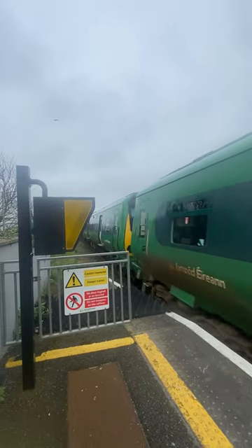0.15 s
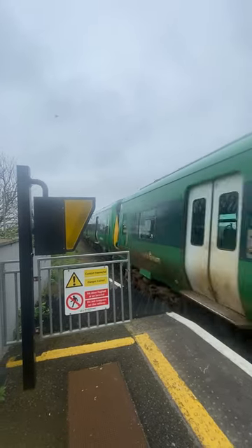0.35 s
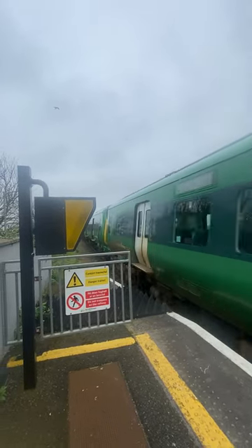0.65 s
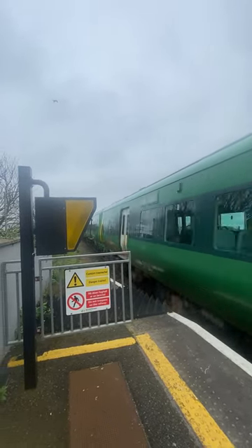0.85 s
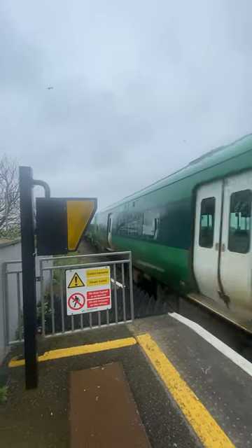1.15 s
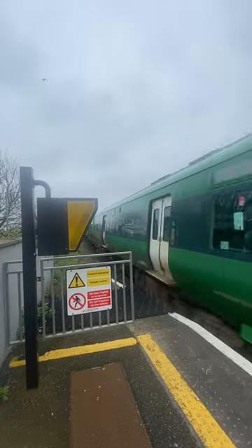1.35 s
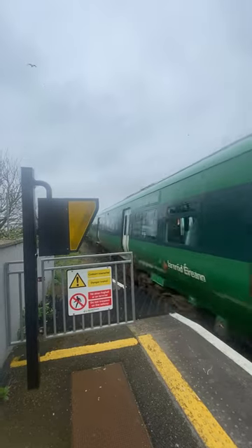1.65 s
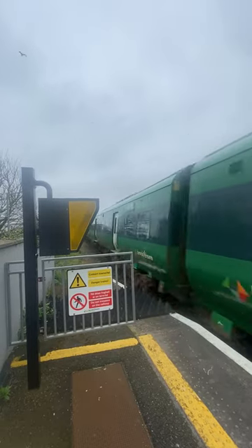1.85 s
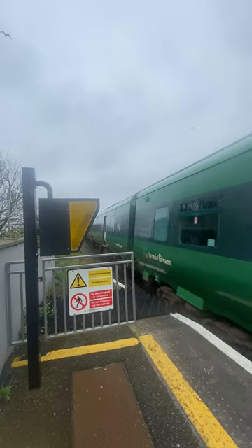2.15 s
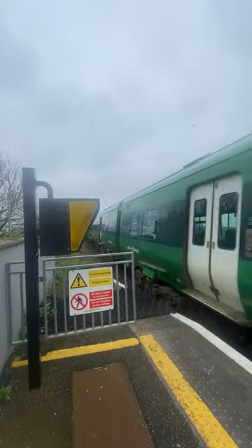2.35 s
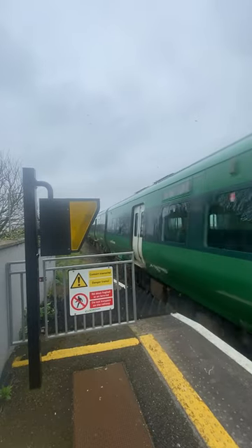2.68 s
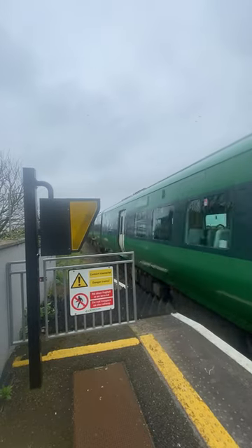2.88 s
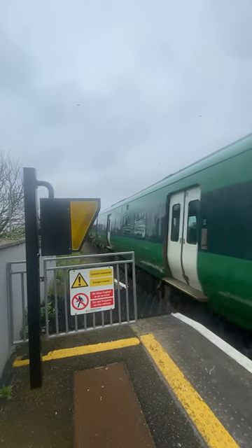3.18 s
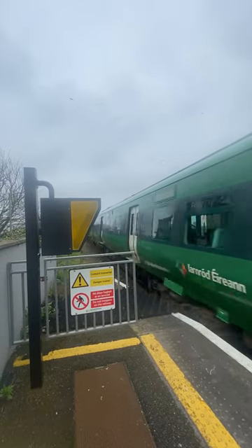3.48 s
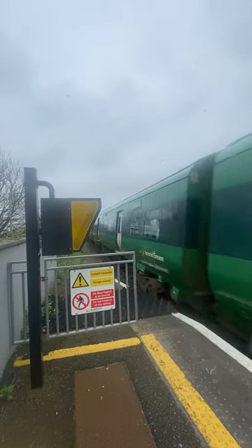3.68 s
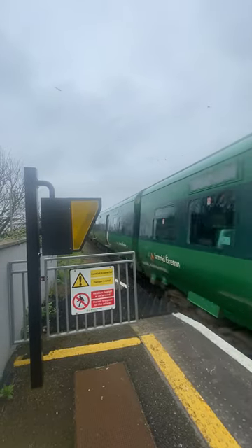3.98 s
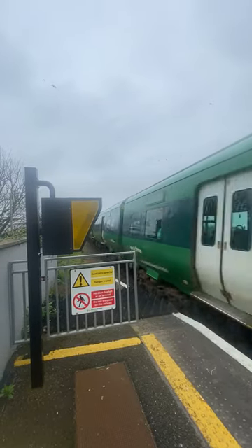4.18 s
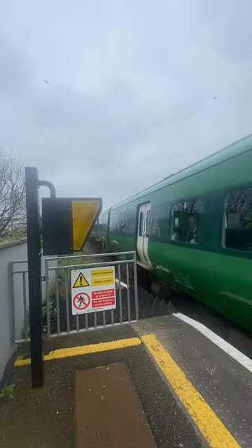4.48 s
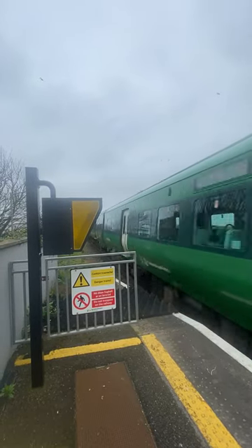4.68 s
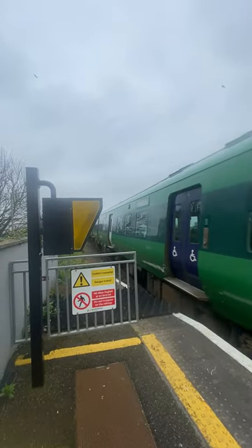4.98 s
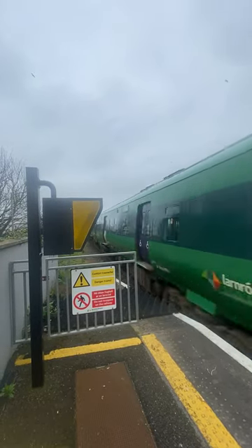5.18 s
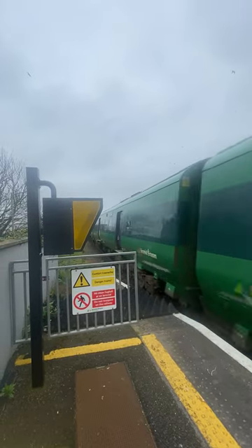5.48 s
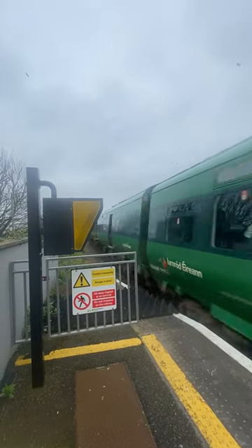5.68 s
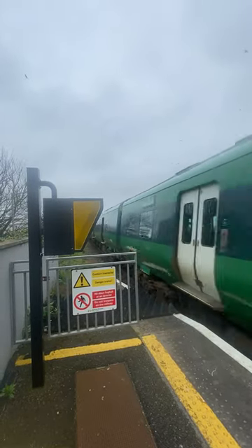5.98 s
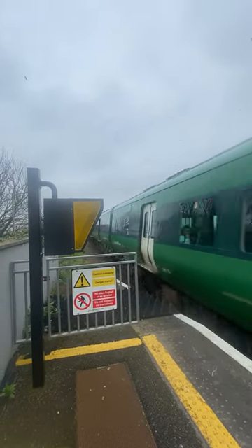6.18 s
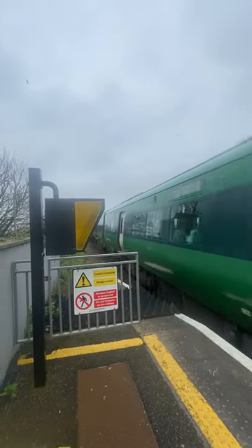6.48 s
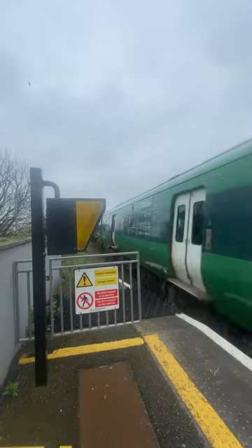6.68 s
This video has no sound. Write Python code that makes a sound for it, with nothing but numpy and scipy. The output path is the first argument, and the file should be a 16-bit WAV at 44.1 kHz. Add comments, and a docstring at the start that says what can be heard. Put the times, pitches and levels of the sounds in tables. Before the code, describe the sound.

A long diesel railcar train passes a few metres from a stereo microphone on an open platform. Engines drone low and beat together, swelling at the start, near the middle and near the end. Wheel roar and bright rush are strongest in the first second, then high squeals waver, air puffs quickly around four seconds, and hiss and thin squealing continue to the end.

```python
"""A station platform: a diesel railcar train runs past, four metres from a two-port microphone.
Exhausts pass in pairs, summed sines that beat as their pitch drops; a throb, generators and whines join.
Wheels and rails roar as coloured noise; narrow tones, rasps, air bursts and squeals are narrow noises.
Air hisses as high noise; a compressor chuffs in noise puffs; soft thuds ring as brief decaying tones."""
import sys
import numpy as np
from scipy import signal
from scipy.fft import rfft, irfft, next_fast_len
from scipy.io import wavfile
from scipy.ndimage import uniform_filter1d, map_coordinates

SR = 44100
rng = np.random.default_rng(int(sys.argv[2]) if len(sys.argv) > 2 else 0)


def dump(signal):
    """Clip the signal to [-1, 1] and save it as 16-bit WAV at the path in sys.argv[1]."""
    limited = np.clip(np.atleast_2d(signal).T, -1, 1)
    pcm = np.round(limited * 32767).astype(np.int16)
    wavfile.write(sys.argv[1], SR, pcm)


N = 301658
T = np.arange(N) / SR


def amp(db):
    """Amplitude ratio of a level in dB."""
    return 10 ** (np.asarray(db) / 20)


def unit(x):
    """x scaled to rms 1."""
    return x / np.sqrt(np.mean(x ** 2) + 1e-20)


def along(points, hz):
    """(hz, value) points interpolated on a log axis."""
    f, v = np.transpose(points)
    return np.interp(np.log(hz + 1), np.log(f + 1), v)


def curves(rows):
    """One value per sample for each column after the time."""
    s, *cols = np.transpose(rows)
    return [np.interp(T, s, c) for c in cols]


def wobble(rate_hz):
    """A smooth random curve, rate_hz knots a second."""
    coarse_s = T[::32]
    knots = rng.standard_normal(int(N * rate_hz / SR) + 4)
    return np.interp(T, coarse_s, map_coordinates(knots, [coarse_s * rate_hz]))


def filtered(x, response):
    """x times a complex response of frequency."""
    m = next_fast_len(N + 8192)
    return irfft(rfft(x, m) * response(np.fft.rfftfreq(m, 1 / SR)), m)[..., :N]


def noise(gain, patchy_db):
    """Two unrelated noises of rms 1, coloured alike, with shared patches of random gain."""
    z = signal.stft(rng.standard_normal((2, N)), nperseg=512)[2]
    field = rng.standard_normal(z.shape[1:])
    field = uniform_filter1d(field, size=5, axis=0)  # over frequency
    field = uniform_filter1d(field, size=10, axis=1)  # over time
    pair = signal.istft(z * amp(patchy_db * unit(field)), nperseg=512)[1][:, :N]
    return unit(filtered(pair, gain))


SPEED_M_S, TRACK_M, SOUND_M_S = 11.4164, 3.9652, 343


def passing(at_s):
    """Clock of a source abreast at at_s, delayed by its sound path (Doppler), and its nearness 0-1."""
    distance_m = np.hypot(TRACK_M, SPEED_M_S * (T - at_s))
    return T - at_s - distance_m / SOUND_M_S, TRACK_M / distance_m


# wheels over an uneven spot: start_s, pitch_hz, peak_db
THUDS = [(4.361, 183, -21), (5.55, 170, -23), (6.1, 172.5, -29)]


def thuds():
    """A soft blow rings the track bed for a few cycles."""
    rise_s = 0.018
    out = np.zeros(N)
    for start_s, hz, peak_db in THUDS:
        since_s = np.maximum(T - start_s, 0)
        swell = since_s / rise_s * np.exp(1 - since_s / rise_s)
        out += amp(peak_db) * swell * np.sin(2 * np.pi * hz * since_s)
    return out


# compressor: abreast_s, strokes_hz, abreast_db
COMPRESSOR = (4.408, 15.6, -26.5)
PUFF_RISE_S = 0.0076


def compressor():
    """One short puff of air a stroke, loudest around abreast."""
    at_s, strokes_hz, db = COMPRESSOR
    clock, near = passing(at_s)
    since_s = (strokes_hz * clock + 0.14) % 1 / strokes_hz
    puff = since_s / PUFF_RISE_S * np.exp(1 - since_s / PUFF_RISE_S)
    # hz, relative_db
    spectrum = [(1500, 4), (3500, -1.5), (5500, 5.0), (7000, -2.5), (9000, 0), (14000, -19)]
    air = noise(lambda hz: amp(along(spectrum, hz)), patchy_db=5.0)
    uneven = amp(1.3 * wobble(14))
    return amp(db) * uneven * near ** 1.02 * puff * air


# underfloor tones: abreast_s, pitch_hz, abreast_db (before wobble)
WHINES = [(-0.32, 221, -25.5), (0.9, 281, -38), (4, 222, -34), (4, 186, -38), (4.5, 220, -49),
          (5, 275, -38.5), (1.5, 300, -41.5), (1.5, 226, -37)]


def whines():
    """Single underfloor tones that slide down as they pass."""
    out = np.zeros(N)
    for at_s, hz, db in WHINES:
        clock, near = passing(at_s)
        level = amp(db + 2.0 * wobble(9.8)) * near ** 1.24
        cycles = hz * clock + 0.08 * wobble(12) + rng.random()
        out += level * np.sin(2 * np.pi * cycles)
    return out


# underfloor generator sets: abreast_s, pitch_hz, abreast_db, overtone_db (2nd harmonic, abreast)
GENERATORS = [(1.3, 75.45, -29, -30), (2.9, 84.5, -53, -63), (5.15, 75.96, -27.5, -31.5),
              (6.301, 80, -34, -61)]


def generators():
    """Underfloor sets hum below the exhaust pitch; their two overtones carry less far."""
    out = np.zeros(N)
    for at_s, hz, db, over_db in GENERATORS:
        clock, near = passing(at_s)
        turn = 2 * np.pi * (hz * clock + rng.random())
        overtones = np.sin(2 * turn) + amp(-7.0) * np.sin(3 * turn)
        out += amp(db) * near ** 0.5 * np.sin(turn)
        out += amp(over_db) * near ** 4.4 * overtones
    return out


# noisy parts of the underframe: abreast_s, rumble_db, roar_db, rush_db, hiss_db (each abreast)
RUNNING_GEAR = [(0.05, -31.5, -25.5, -20, -27.5), (0.45, -40, -28, -21.5, -25.5),
                (0.95, -44, -40, -32, -38), (1.45, -31.5, -42, -30, -35.5), (2.4, -35.5, -36, -37, -43),
                (2.9, -36, -32.5, -34, -54), (3.45, -36.5, -50, -40, -40.5), (3.95, -35, -35, -37, -42),
                (4.3, -38, -31, -30, -34.5), (5.25, -32.5, -38.5, -34, -36), (5.65, -31.5, -38.5, -59, -50),
                (6.1, -38, -32.5, -56, -55), (6.55, -32.5, -29.5, -33, -44)]
# steady level of the rest of the train: one level_db each for rumble, roar, rush, hiss
REST_DB = [-35, -36.5, -43, -46.5]
# fading with distance: one exponent of nearness each for rumble, roar, rush, hiss
FADES = [1.62, 1.74, 1.86, 2.4]
# low rumble spectrum: hz, relative_db (per Hz)
RUMBLE = [(31, -45), (42, -14), (63, -4.5), (105, 0), (220, -1.5), (350, -7.5), (600, -11.5), (1000, -68)]
# wheel roar spectrum: hz, relative_db (per Hz)
ROAR = [(200, -6), (420, -3.5), (800, 2), (1300, -0.5), (1800, -5.5), (2300, -5), (3000, -9), (4500, -19)]
# upper rush spectrum: hz, relative_db (per Hz)
RUSH = [(1500, -11), (2700, -3.5), (4000, -11), (5200, -4), (6300, -6), (7500, -9.5), (9000, -33)]
# high air hiss spectrum: hz, relative_db (per Hz)
HISS = [(6000, -61), (8000, 7.5), (9000, 4.5), (11000, 2), (13000, 1.5), (15000, -1), (16000, -23)]


def rolling():
    """Wheel and rail noise in four layers; each swells as a noisy part of the underframe passes."""
    at_s, *levels_db = np.transpose(RUNNING_GEAR)
    near = np.array([passing(s)[1] for s in at_s])
    spectra, patches_db = (RUMBLE, ROAR, RUSH, HISS), (1.03, 1.25, 1.5, 2.0)
    out = 0
    for db, rest_db, fade, spectrum, patchy_db in zip(levels_db, REST_DB, FADES, spectra, patches_db):
        power = amp(rest_db) ** 2 + amp(db) ** 2 @ near ** (2 * fade)
        flutter = amp(0.6 * wobble(20))
        layer = noise(lambda hz: amp(along(spectrum, hz)), patchy_db)
        out = out + np.sqrt(power) * flutter * layer
    return out


ATTACK_S, RELEASE_S = 0.054, 0.084


def spell(start_s, end_s, first_db, last_db):
    """Soft rise before start_s, steady drift in level, soft fall after end_s."""
    rise = 1 + (T - start_s) / ATTACK_S
    fall = 1 + (end_s - T) / RELEASE_S
    edges = np.clip(np.minimum(rise, fall), 0, 1)
    return np.sin(np.pi / 2 * edges) ** 2 * amp(np.interp(T, [start_s, end_s], [first_db, last_db]))


def narrow_sound(hz, width_hz):
    """Narrow noise, swelling unevenly; the narrower it is, the more of a wavering tone it holds."""
    off_hz = np.fft.fftfreq(next_fast_len(N), 1 / SR)  # from the centre
    turn = 2 * np.pi * np.cumsum(hz + 0.07 * width_hz * wobble(5)) / SR
    phases = np.exp(2j * np.pi * rng.random((2, len(off_hz))))
    grains = phases / np.abs(1 + 2j * off_hz / width_hz) ** 1.49
    pair = unit((np.fft.ifft(grains)[:, :N] * np.exp(1j * turn)).real)
    waver = 2 * np.pi * np.cumsum(0.22 * width_hz * wobble(14)) / SR
    clear = np.exp(-(width_hz / 500) ** 2)  # broad sounds hold almost no tone
    pair[0] += 0.44 * clear * amp(2.5 * wobble(9.1)) * np.sin(turn + waver)
    swell_db = 0.85 * wobble(45) + 0.8 * wobble(22) + 0.74 * wobble(8.5)
    return amp(swell_db) * pair


# narrow tones, rasps and air bursts of the passing train: pitch_hz, width_hz,
# spells [start_s, end_s, first_db, last_db, pitch_drop_hz]
NARROW_SOUNDS = [ (742, 24, [(0.1, 0.62, -37, -38, 13)]), (769, 28.8, [(4.1, 4.5, -40, -46, 10)]),
                 (852, 41.5, [(2.62, 3.3, -38, -40.5, 38), (5.8, 6.2, -41.5, -39, 0.48),
                 (6.35, 6.64, -30.5, -36, 11.8)]), (3890, 1000, [(0.0044, 1.04, -27, -39, 0.0045)]),
                 (5040, 240, [(5.1, 5.4, -41, -45, -0.5), (6.1, 6.4, -39, -45, 0.5),
                 (6.53, 6.84, -36.5, -38, 57)]), (5250, 920, [(4.13, 4.26, -32, -42, 0),
                 (6.42, 6.84, -35.5, -44, 0.0025)]), (5660, 160, [(1.3, 1.39, -42, -38, 0),
                 (1.62, 1.68, -40, -35, 0)]), (5870, 120, [(1.44, 1.5, -46, -41, 0),
                 (1.56, 1.6, -31, -32, 31), (1.78, 1.84, -37, -43, 0)]),
                 (6700, 200, [(6.02, 6.38, -46, -41, -7.5)]), (7050, 37.2, [(2.27, 2.76, -38, -32, 19.5),
                 (3.12, 3.2, -29, -38, -2)]), (7040, 470, [(4.17, 4.56, -36, -34, 101)]),
                 (8600, 80, [(5.5, 5.95, -40, -38, 30.1), (6.08, 6.33, -40, -39, 30.04),
                 (6.45, 6.84, -39, -39, 30)]), (11200, 54, [(5.4, 5.62, -48, -46, 20),
                 (6.0, 6.26, -43, -51, 20)]), (8850, 290, [(2.4, 3.1, -47, -43, -0.5),
                 (3.34, 3.7, -39, -52, 2), (3.86, 4.09, -42, -36, -200)]),
                 (9045, 34.6, [(4.72, 5, -36, -38.5, 21), (6.05, 6.45, -50, -35, -30.5)]),
                 (10910, 510, [(3.33, 5.1, -50.5, -41.5, 0.5), (5.26, 5.9, -37.5, -42, 148.5),
                 (5.98, 6.27, -37, -41, -6)]), (10930, 40, [(3.35, 4.95, -53, -43.5, -1.5),
                 (5.24, 6.24, -42, -44, 21)]), (12700, 270, [(6.42, 6.84, -42, -30, 0.004)]),
                 (14200, 400, [(1.75, 2.2, -38, -44, 0.0019), (2.7, 3.6, -43, -45, 0.0067)]),
                 (15000, 500, [(5.2, 5.46, -43, -38, 0)]), ]
# squeals whose pitch and level wander, point by point: width_hz, [time_s, pitch_hz, level_db]
SQUEALS = [ (110.5, [(1.3, 4910, -70), (1.35, 4980, -34), (1.42, 5070, -28), (1.5, 4930, -33),
           (1.57, 5020, -35), (1.63, 5070, -25.5), (1.67, 5000, -30), (1.705, 5010, -33), (1.75, 4950, -40),
           (1.8, 4950, -70)]), (259.8, [(0.68, 6930, -41), (0.9, 6860, -33), (1.12, 6870, -37),
           (1.28, 6840, -31), (1.43, 6800, -40), (1.52, 6870, -31), (1.59, 6720, -32), (1.7, 6820, -28),
           (2.1, 6770, -28), (2.25, 6770, -33.5), (2.6, 6790, -27.5), (2.95, 6860, -24.5),
           (3.07, 6860, -33), (3.15, 6780, -29.5), (3.35, 6700, -28.5), (3.45, 6700, -34.5),
           (3.62, 6730, -29.5), (3.9, 6680, -43)]), (300, [(4.56, 9050, -48), (4.68, 8900, -35),
           (4.84, 9070, -38), (4.98, 8920, -35), (5.12, 8930, -46), (5.38, 9060, -41), (5.48, 9000, -28.5),
           (5.7, 8920, -31.5), (5.86, 8960, -31.5), (5.95, 8870, -35), (6.2, 8990, -29.5),
           (6.36, 9030, -25), (6.5, 9060, -31.5), (6.66, 9010, -29.5), (6.84, 8900, -35)]),
           (280.4, [(5.02, 7090, -61), (5.075, 7120, -27), (5.25, 7100, -26.5), (5.32, 7000, -29),
           (5.36, 7000, -32), (5.43, 7000, -33), (5.48, 7040, -65)]), ]


def narrow_sounds():
    """Narrow tones, rasps and air bursts in spells with one steady slide, and squeals that wander."""
    out = 0
    for hz, width_hz, spells in NARROW_SOUNDS:
        start_s, end_s, first_db, last_db, drop_hz = np.transpose(spells)
        knots_s = np.ravel([start_s, end_s], "F")
        slide_hz = np.interp(T, knots_s, np.ravel([drop_hz, -drop_hz], "F") / 2)
        level = sum(map(spell, start_s, end_s, first_db, last_db))
        out = out + level * narrow_sound(hz + slide_hz, width_hz)
    for width_hz, rows in SQUEALS:
        hz, db = curves(rows)
        out = out + amp(db) * narrow_sound(hz, width_hz)
    return out


# engines' half-rate shaft tone, heard as one: time_s, pitch_hz, rms_db (before wobble)
THROB = [(0.09, 45, -30), (0.9, 45.2, -34), (1.01, 45.2, -42), (1.12, 45.4, -29), (1.26, 45, -37),
         (1.39, 46.3, -33), (1.5, 49.5, -40.5), (2.66, 49.2, -30.5), (3.24, 46.1, -30), (3.39, 46.3, -36),
         (3.66, 46.5, -28), (3.89, 46, -40.5), (4.46, 46.5, -34), (4.63, 46.2, -34), (4.89, 48.5, -34),
         (5.03, 48.8, -41), (5.22, 49.8, -29), (5.35, 49.1, -42), (5.49, 49.1, -32), (6.0, 48.6, -32),
         (6.23, 48, -25), (6.48, 47.4, -33), (6.82, 48.1, -28)]


def throb():
    """A deep throb under the exhaust hum, strongly swelling and sinking."""
    hz, db = curves(THROB)
    level = np.sqrt(2) * amp(db + 1.8 * wobble(12))
    return level * np.sin(2 * np.pi * np.cumsum(hz) / SR)


# exhausts: abreast_s, firing_hz
EXHAUSTS = [(-0.2401, 93.719), (-0.031, 96.353), (2.8428, 95.594), (3.1568, 95.411), (6.326, 94.763),
            (6.6108, 94.909)]
# firing tone of each exhaust, in that order: [time_s, rms_db]
DRONE = [
    [(0.1, -14), (0.47, -23.9), (1.09, -17.5), (1.75, -35.5), (2.81, -27), (3.41, -47)],
    [(3.39, -38), (3.97, -32.5), (5.79, -33)],
    [(0.2, -14), (1.58, -25), (2.38, -20.5), (3.28, -18), (5.07, -22), (6.25, -26)],
    [(1.01, -25.5), (2.55, -15), (3.6, -26.5), (4.76, -30.5), (5.71, -18.5), (6.84, -26.5)],
    [(1.8, -45), (2.91, -14), (3.33, -23), (5.0, -25.5), (6.07, -16), (6.84, -18.5)],
    [(1.65, -25.5), (2.65, -51), (5.11, -27.5), (6.26, -16.5), (6.84, -25)],
]
# offset of each engine's shaft orders, in that order: load_db
LOAD = [5, -7, 1.6, -9.5, 3.5, -4]
# shaft orders: multiple_of_firing_rate, abreast_db (before load and wobble), fade_exponent (of nearness)
ORDERS = [(1.5, -32.5, 1.2), (2, -33, 2.4), (2.5, -40, 1.65), (2.83, -40.5, 1.04), (8, -41, 2),
          (9, -45.5, 2.1), (12, -44, 1.4)]


def engines():
    """Each exhaust hums at its firing rate; weaker shaft orders fade with distance."""
    out = np.zeros(N)
    for (at_s, hz), rows, load_db in zip(EXHAUSTS, DRONE, LOAD):
        clock, near = passing(at_s)
        out += np.sqrt(2) * amp(curves(rows)[0]) * np.sin(2 * np.pi * hz * clock)
        for order, order_db, fade in ORDERS:
            level = amp(order_db + load_db + 2.4 * wobble(5 + 1.2 * order)) * near ** fade
            # uneven firing blurs high orders
            cycles = order * (hz * clock + 0.022 * wobble(25)) + rng.random()
            out += level * np.sin(2 * np.pi * cycles)
    return out


# left-right likeness of the noise: hz, correlation (0-1)
ALIKE = [(60, .99), (170, .98), (300, .95), (600, .6), (1400, .72), (2750, .82), (4300, .45), (5400, .66),
         (6700, .74), (8300, .62), (9700, .8), (9900, .995), (10900, .995), (11800, .72), (12700, .83),
         (13100, .998), (14300, .998), (14900, .6), (15700, .8)]
# phase by which left leads right: hz, lead_rad
LEAD = [(0, -.08), (170, -.13), (600, .4), (1460, -.1), (1900, .45), (2330, 2.5), (2750, 2.9), (3200, 2.4),
        (4050, .5), (4480, 1.7), (4900, 1.5), (5340, .5), (6600, 2.5), (7500, 3), (8800, 4.55),
        (9900, 6.28), (10800, 6.28), (13100, 9.42), (14400, 9.42), (15250, 11.7), (15700, 12.4)]
# level of left over right: hz, lean_db
LEAN = [(110, .2), (200, -1.5), (380, -2.5), (700, .5), (1290, 2.5), (2380, 2), (4400, -1.3), (8120, 0)]


def ports(tones, pair):
    """Tones feed both ports alike, noise is partly unrelated; sound from the side reaches one port first."""
    def split(hz):
        angle = np.arccos(np.clip(along(ALIKE, hz), 0, 1)) / 2
        return np.array([np.cos(angle), np.sin(angle)])

    def offset(hz):
        half = amp(along(LEAN, hz) / 2) * np.exp(0.5j * np.interp(hz, *np.transpose(LEAD)))
        return np.array([half, 1 / half])

    mid, side = filtered(pair, split)
    return filtered(np.array([tones + mid + side, tones + mid - side]), offset)


def scene():
    """The passing train at both ports."""
    tones = thuds() + whines() + generators() + throb() + engines()
    pair = compressor() + rolling() + narrow_sounds()
    return ports(tones, pair)


TOP_HZ = 15800


def record(dry):
    """Nothing is kept above the band limit."""
    return filtered(dry, lambda hz: hz < TOP_HZ)


dry = scene()
out = record(dry)
dump(out)
```